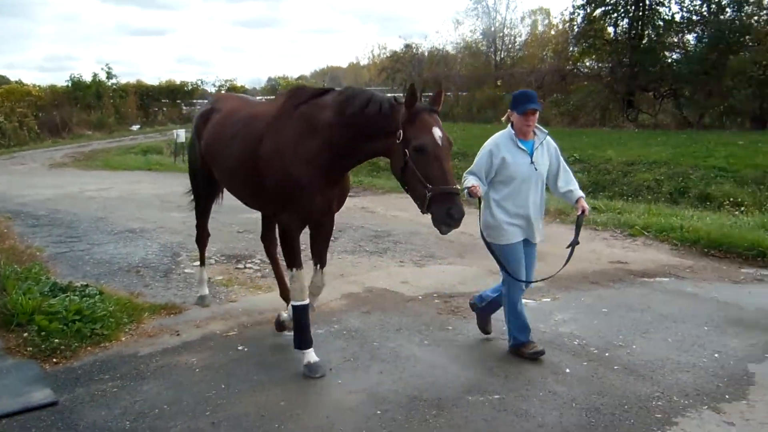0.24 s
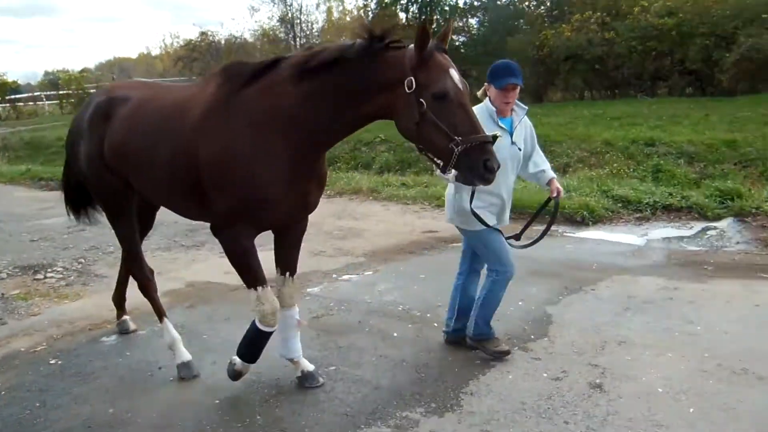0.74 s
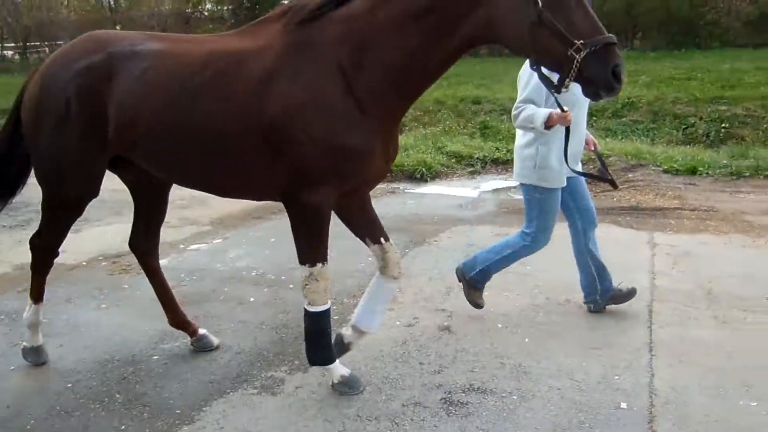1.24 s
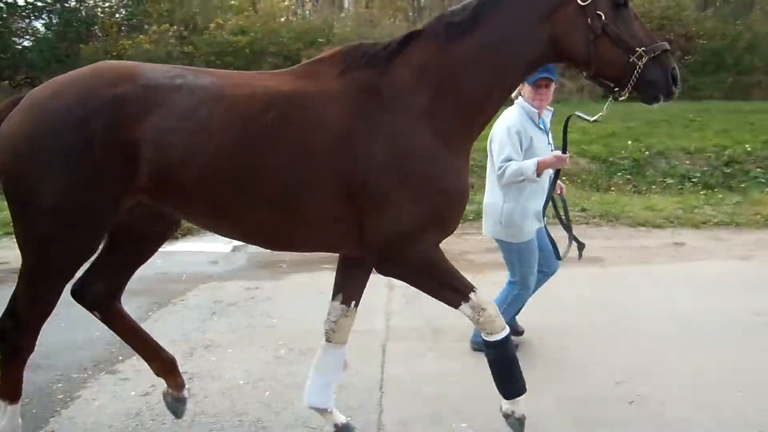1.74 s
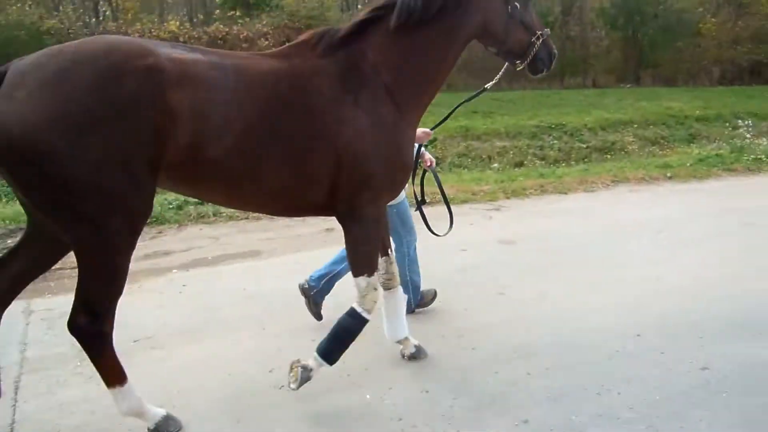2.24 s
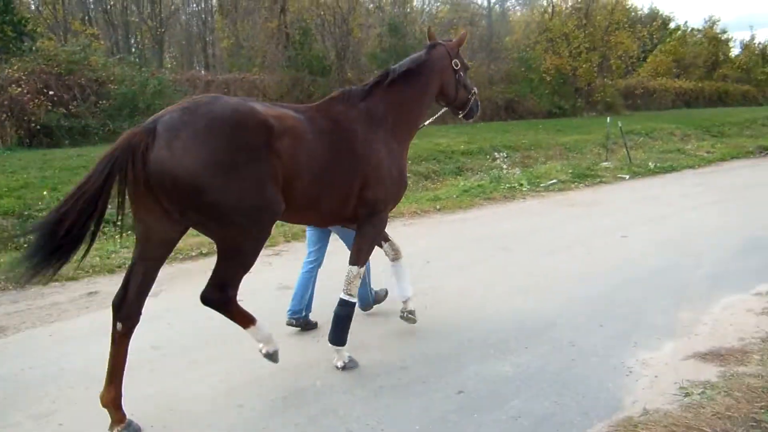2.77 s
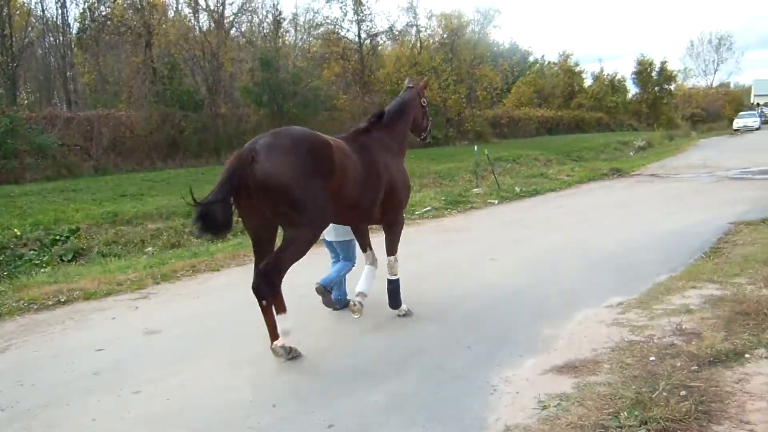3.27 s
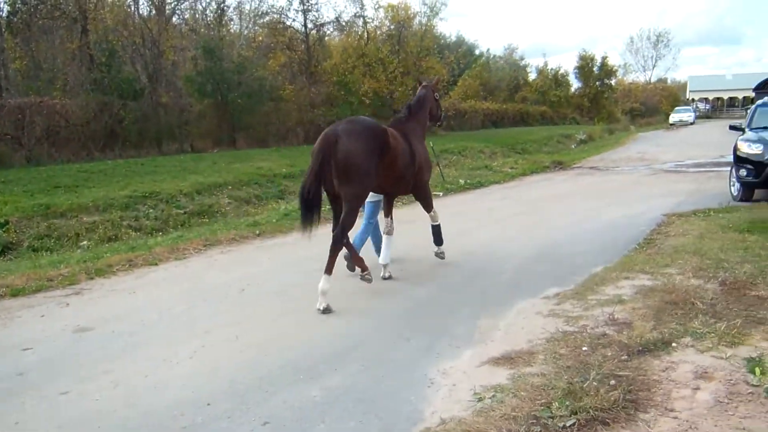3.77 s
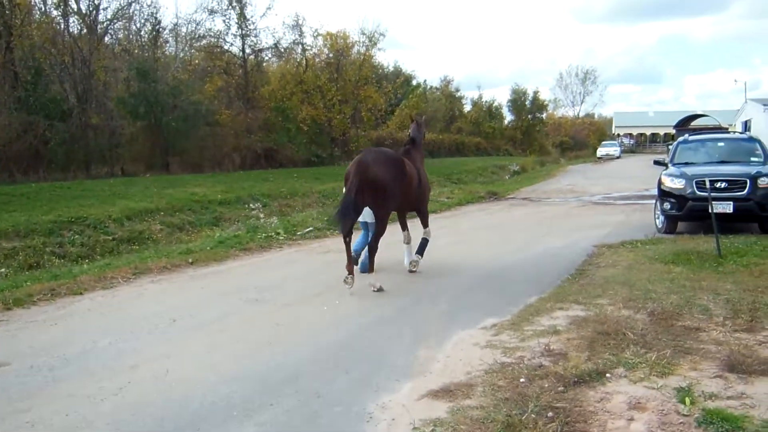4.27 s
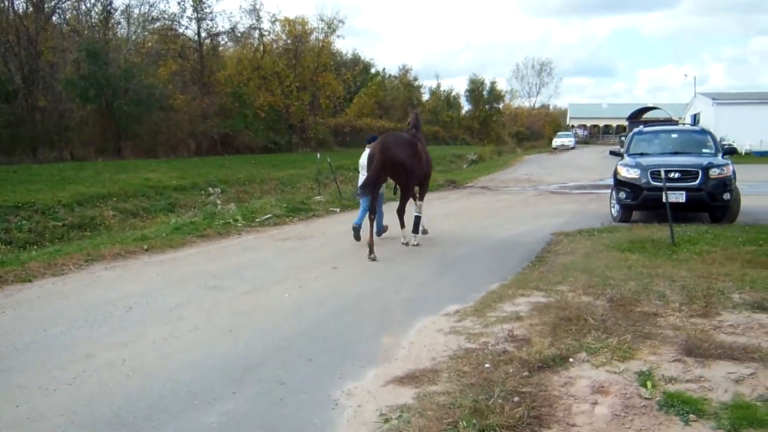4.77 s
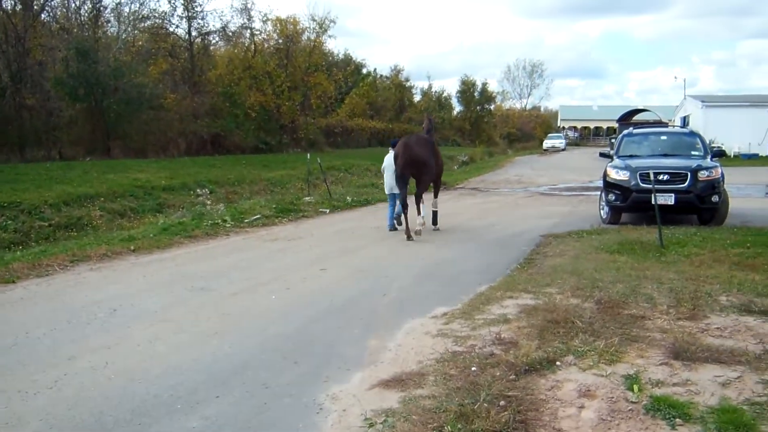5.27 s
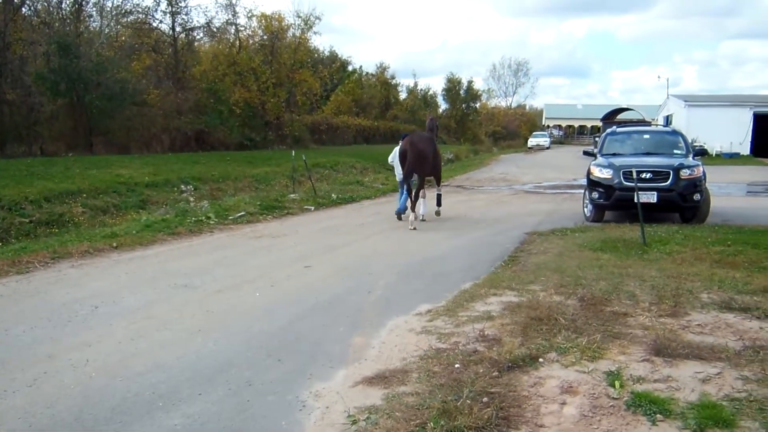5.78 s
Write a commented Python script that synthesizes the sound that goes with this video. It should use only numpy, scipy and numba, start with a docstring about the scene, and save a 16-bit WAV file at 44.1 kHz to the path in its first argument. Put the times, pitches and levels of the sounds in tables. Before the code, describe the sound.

A shod horse trots past on a paved drive, gritty clip-clops ringing close, a lead chain jingling, wind buffeting the microphone.

```python
"""A shod horse is led at a trot past two close microphone ports and away along a paved drive.
Footfalls are clusters of heel, toe and sliding contacts: struck resonators plus grit noise and stone pings.
A lead chain chinks (noise swells through high resonances); shoes brush sand (grainy band noise).
Far birds whistle (gliding sines); wind buffets the ports over a distant roar (noise in narrow bands)."""
import sys
import numpy as np
from scipy import signal
from scipy.io import wavfile
from scipy.ndimage import uniform_filter1d, map_coordinates
from numba import njit

SR = 44100
rng = np.random.default_rng(int(sys.argv[2]) if len(sys.argv) > 2 else 0)


def unload_audio(sound):
    """Save the sound as a 16-bit wav file, at the path given as the first command line argument."""
    columns = np.transpose(np.atleast_2d(sound))
    # keep every value between -1 and 1, then stretch to whole-number steps
    steps = np.round(np.clip(columns, -1, 1) * 32767)
    wavfile.write(sys.argv[1], SR, steps.astype(np.int16))


N = 265129
SIDES = np.array([[1], [-1]])  # sign of the unshared part at the left and right port


def undb(db):
    """Amplitude ratio of a level in dB."""
    return 10 ** (np.asarray(db) / 20)


def unit(x):
    """Scale to an RMS of 1."""
    return x / np.sqrt(np.mean(x ** 2))


@njit
def svf(x, hz, width):
    """State-variable band-pass, gain 1 at the centre, which may move every sample."""
    y, b, l = np.empty(len(x)), 0., 0.
    for i in range(len(x)):
        g, k = np.tan(np.pi * hz[i] / SR), width / hz[i]
        v = (b + g * (x[i] + 1e-18 - l)) / (1 + g * (g + k))
        b, l, y[i] = 2 * v - b, l + 2 * g * v, k * v
    return y


def narrow_noise(hz, width_hz):
    """White noise through one fixed resonance."""
    return svf(rng.standard_normal(N), np.full(N, hz), width_hz)


def band(x, lo_hz, hi_hz):
    """Butterworth band-pass, second order at each edge."""
    return signal.sosfilt(signal.butter(2, [lo_hz, hi_hz], "band", fs=SR, output="sos"), x)


def curve(table):
    """Breakpoints (t/s, value) interpolated to every sample."""
    s, value = np.transpose(table)
    return np.interp(np.arange(N) / SR, s, value)


def walk(rate_hz):
    """Random levels held 1 / rate_hz and slewed twice."""
    k = int(SR / rate_hz)
    held = np.repeat(rng.standard_normal(N // k + 1), k)
    return uniform_filter1d(uniform_filter1d(held, k), k)[:N]


def bursts(s, db, fade_ms, rise_ms=0.13):
    """Impulses through two one-pole smoothers: rise and exponential fade."""
    env = np.zeros(N)
    np.add.at(env, np.clip((s * SR).astype(int), 0, N - 1), undb(db))
    env = signal.lfilter([1], [1, -np.exp(-1e3 / (fade_ms * SR))], env)
    keep = np.exp(-1e3 / (rise_ms * SR))
    return signal.lfilter([1 - keep], [1, -keep], env)


def grains(spread_db):
    """Dense noise whose samples now and then stand far out, like breaking grit."""
    return unit(rng.standard_normal(N) * undb(spread_db * rng.exponential(size=N)))


def ring(x, modes, detune=0.95):
    """Struck-body resonances of alternating sign, equally loud for a short blow whatever their width."""
    out = 0
    for k, (hz, width_hz, db) in enumerate(modes):
        gain = (-1) ** k * undb(db) * SR / (2 * np.pi * width_hz)
        out = out + gain * svf(x, hz * detune * np.ones(len(x)), 1. * width_hz)
    return out


def ports(mid, side, pan_db=0.):
    """Two close ports: shared and unshared parts, right port delayed; positive pan favours the left."""
    # the right port hears the horse later while it is off to one side: t/s, lag/samples
    bearing = [(0, .5), (1.8, 1.1), (2.8, .5), (4, .3), (5, .1), (6, 0.)]
    late = map_coordinates(mid - side, [np.arange(N) - curve(bearing)], order=3, mode="nearest")
    return np.array([(mid + side) * undb(pan_db / 2), late * undb(-pan_db / 2)])


def roar():
    """Distant roar: third-octave-spaced noise bands flicker alone and part between ports in the treble."""
    # overall level: t/s, level/dB
    roar_level = [(0., -39), (.6, -43), (1.12, -39), (1.49, -44), (2.39, -46), (3.55, -45), (3.8, -52),
                  (4.05, -42.5), (4.65, -44), (5.04, -38.5), (5.5, -43), (6.01, -35.5)]
    # relative spectral density: f/Hz, level per Hz/dB
    colour = [(76, -30), (130, -27), (225, 4.5), (421, -15), (599, 5.5), (939, 6), (1940, -12.5),
              (4680, -19), (11700, -16), (14000, -20)]
    known_hz, known_db = np.transpose(colour)
    out = 0
    for hz in 140 * 2 ** np.arange(0, 4.6, 1 / 3):
        mid, side = (narrow_noise(hz, hz / 4) for _ in range(2))
        db = np.interp(np.log(hz), np.log(known_hz), known_db) + 6.6 * walk(12)
        apart = np.clip(0.062 + (hz / 3500.0) ** 1.4 + 14.0 / hz, 0, 1)
        out = out + undb(db) * (mid + apart * side * SIDES)
    return unit(out) * undb(curve(roar_level))


def wind():
    """Low turbulence on the ports: each eddy size puffs on its own and follows the gusts by its own slope."""
    # gusts: t/s, relative level/dB
    gusts = [(0.0, -39), (0.08, -35.5), (0.27, -36), (0.44, -45), (1.12, -43), (1.39, -52.5), (1.57, -41),
             (2.44, -53.5), (2.53, -41), (2.86, -39.5), (2.91, -32.5), (3.15, -42), (3.21, -31),
             (3.6, -47.5), (3.87, -34.5), (4.6, -43.5), (4.8, -56), (4.9, -40), (5.39, -47.5), (5.62, -37),
             (5.72, -43.5), (5.77, -32.5), (5.89, -38), (6.01, -37)]
    gust_db = curve(gusts)
    mean_db = np.mean(gust_db)
    out = 0
    # f/Hz, width/Hz, relative level/dB, dB per dB of gust
    for hz, width_hz, db, steep in ((32.2, 8.9, -2.0, 1.0), (57.7, 18.0, -5.0, 1.23),
                                    (82.8, 12.7, -6.5, 0.87), (143.0, 58.0, -15.5, 1.32)):
        strength = undb(db + mean_db + steep * (gust_db - mean_db))
        mid, side = (unit(narrow_noise(hz, width_hz)) * strength * undb(2.67 * walk(15))
                     for _ in range(2))
        out = out + mid + .7 * side * SIDES
    return out


def scuff():
    """Sandy drag hiss, grainy, nearly unrelated at the ports, swelling under the handler's soft shoes."""
    # shoes and hooves dragging over sand between footfalls: t/s, relative level/dB
    drag = [(0.0, -41), (0.62, -47.5), (1.19, -42), (1.54, -54.5), (2.58, -54), (2.78, -49), (3.67, -54),
            (4.27, -46.5), (4.67, -51), (6.01, -49.5)]
    # handler's soft shoes brushing sand, onset 20 ms before t: t/s, drive level before smoothing/dB
    steps = [(2.745, -63), (3.488, -37), (3.801, -36), (4.12, -33.5), (4.42, -40), (4.79, -38), (5.08, -34),
             (5.45, -47)]
    s, db = np.transpose(steps)
    brush = undb(curve(drag) + 0.5 * walk(19)) + bursts(s - .02, db, fade_ms=8.3, rise_ms=18.0)
    mid, side = (unit(band(grains(2.36), 2100, 13600)) * brush for _ in range(2))
    return mid + 0.86 * side * SIDES


def contacts():
    """Listed contacts and random loose grit in time order; fine grit and trail levels by rule and chance."""
    # hooves and kicked grit on paving:
    # t/s, relative thud level/dB, relative hoof ring level/dB, relative grit level/dB, largest stone f/kHz
    strikes = [(.03,-50,-49,-18,2.64), (.0875,-27,-32,-26,9.6), (.0993,-43,-31,-31,3.4),
               (.1081,-10.5,-7.5,-9,3.26), (.1175,-42,-24.5,-50,2.3), (.1441,-16,-7.5,-10,8.4),
               (.1672,-39,-34,-25.5,4.4), (.3113,-28,-26,-39,2.2), (.3326,-22,-13,-15,4.33),
               (.3452,-21.5,-22,-17,3.2), (.3521,-18,-15.5,-14,1.53), (.3763,-26,-30,-33,2.4),
               (.5989,-28.5,-17.5,-19,4.3), (.621,-18,-16,-8,8.2), (.6412,-34,-38,-55,3.4),
               (.7863,-35,-20,-29.5,2.4), (.794,-28,-20,-24,3.4), (.8033,-35,-31,-24,2.9),
               (.8116,-28.5,-22.5,-24,3.3), (1.0648,-21.5,-20.5,-18,4.), (1.0867,-31,-35,-33,4.3),
               (1.1876,-45,-41,-28.5,6.2), (1.2198,-28,-31,-27,2.3), (1.2268,-15,-12.5,-9,2),
               (1.2575,-17,-13,-7.5,6), (1.53,-29,-29,-26,7.8), (1.5399,-26,-12.5,-24,2.1),
               (1.5459,-27,-35,-16.5,3.3), (1.5545,-23,-13.5,-19,7.4), (1.5624,-9.5,-15.5,-14.5,7.1),
               (1.576,-40,-30,-49,1.9), (1.588,-30,-35,-30,7.3), (1.596,-41,-36,-20.5,1.9),
               (1.6017,-29,-30,-21,6), (1.6198,-35,-35,-29,5), (1.8887,-19,-14.5,-8,6.4),
               (1.899,-34,-20.5,-41,1.9), (1.9067,-29,-19,-35,2.1), (1.9162,-44,-38,-31,1.9),
               (1.9334,-30,-28,-21,3), (1.9369,-23,-16,-13,7.4), (2.042,-48,-37,-30.5,7.),
               (2.1548,-51,-27,-23.5,7.4), (2.2454,-27,-13,-21,1.6), (2.2559,-22,-18,-25,3.6),
               (2.2709,-33,-12.5,-19.5,2.), (2.2779,-23,-45,-38,2.1), (2.2879,-15.5,-10.5,-10,7.8),
               (2.308,-25,-28,-30,7.7), (2.5912,-33,-10,-11.5,1.7), (2.5968,-27,-15,-25,3.6),
               (2.6034,-22,-19,-21,1.9), (2.615,-24.5,-10.5,-14.5,7.3), (2.6347,-42,-26,-36,6.8),
               (2.6614,-40,-24.5,-28.5,4.6), (2.8521,-51,-50,-24,3.76), (2.8586,-44,-50,-21,8.5),
               (2.873,-55,-44,-30,9.3), (2.8803,-36,-40,-33,7.1), (2.917,-26,-11.5,-15,2.1),
               (2.9265,-28.5,-13,-13.5,7.5), (2.9371,-50,-8,-18,4.3), (2.9419,-29,-24,-22,3.9),
               (2.9478,-21,-16,-32,3.1), (2.9545,-17,-14,-11,3.27), (2.9729,-41,-24,-45,2.7),
               (3.152,-37,-40,-30.5,4.1), (3.2117,-34,-26,-23.5,3.1), (3.2593,-21,-6.5,-7.5,1.78),
               (3.2699,-30,-8.5,-11.5,1.9), (3.277,-33,-15,-10.5,7.5), (3.2865,-31,-29,-40,1.8),
               (3.296,-45,-36,-41,8.1), (3.5924,-31,-15,-21.5,1.5), (3.5989,-53,-13,-8.5,6.64),
               (3.606,-40,-15.5,-24,6.1), (3.6144,-33,-23.5,-19.5,2.05), (3.6294,-38,-38,-29,7.6),
               (3.857,-44,-32,-33.5,3), (3.864,-54,-41,-38,5.), (3.9036,-43,-12,-12,4.4),
               (3.921,-36,-11,-12,1.76), (3.9274,-36,-8.5,-13.5,3.4), (3.9353,-23,-15,-12,9),
               (3.9436,-26,-21,-23,2.7), (3.9556,-43,-24,-34,6.9), (4.2135,-33,-28,-36,2.9),
               (4.233,-41,-13,-14.5,1.5), (4.2427,-30,-12.5,-18.5,2.2), (4.2518,-18.5,-11.5,-11.5,2.84),
               (4.2578,-21,-14.5,-19,2.6), (4.2656,-29,-7.5,-20,6.3), (4.278,-36,-15.5,-30,3.1),
               (4.5787,-47,-11,-13,3.5), (4.5874,-34,-10.5,-8.5,1.95), (4.596,-23.5,-15,-12,4.2),
               (4.6057,-22,-12,-11,1.7), (4.613,-44,-14.5,-22,4.5), (4.6197,-21.5,-26,-38,2.1),
               (4.6303,-32,-38,-31,4.5), (4.897,-32,-20.5,-28.5,1.6), (4.9094,-30,-17,-26,1.7),
               (4.9223,-25.5,-13,-16,3.2), (4.928,-31,-21,-22,5.8), (4.9346,-22,-12,-21.5,3.7),
               (4.9558,-37,-34,-34,3.1), (5.2585,-26,-10,-9.5,2.73), (5.2747,-34,-11,-18,4.8),
               (5.2783,-21.5,-23,-23,1.9), (5.2884,-35,-22,-20,2), (5.292,-33,-28,-37,1.9),
               (5.3082,-37,-22.5,-25.5,2.3), (5.3208,-49,-34,-39,1.9), (5.3283,-35,-33,-32,2.2),
               (5.3512,-39,-33,-23,2.4), (5.6015,-43,-18.5,-19,3.4), (5.6101,-32,-24,-24,3.4),
               (5.6151,-25,-17.5,-37,5), (5.6226,-26,-18,-21.5,3.7), (5.6301,-46,-18.5,-19.5,2.5),
               (5.6422,-42,-30,-28,2.3), (5.9594,-25,-10.5,-15,3), (5.9709,-27,-22,-19.5,5.4),
               (5.9803,-28,-40,-17,2), (5.9905,-26,-28,-29,5.2), (5.9957,-24,-20,-22,3.1)]
    # faint loose grit skipping between footfalls
    loose_per_s, low_khz, high_khz = 12, 2.07, 7.8
    loose_db, loose_spread_db = [-46, -46, -44.5], 2.5  # thud, ring, grit
    loose_s, pitch = rng.random((int(loose_per_s * N / SR), 2)).T
    scatter_db = loose_spread_db * rng.standard_normal((len(loose_s), 3)) + loose_db
    loose_khz = low_khz * (high_khz / low_khz) ** pitch
    rows = np.vstack([strikes, np.column_stack([loose_s * N / SR, scatter_db, loose_khz])])
    s, thud_db, ring_db, grit_db, stone_khz = rows[np.argsort(rows[:, 0])].T

    fine_chance, trail_chance = rng.standard_normal((len(s), 2)).T
    octaves = np.log2(stone_khz / 4)
    # fine grit is stronger where stones are small, and thins out as the horse draws away
    passes_s, fade_db_per_s = 1.95, -1.5
    gone_s = np.maximum(s - passes_s, 0)
    fine_db = grit_db - 4.5 + 3 * octaves + fade_db_per_s * gone_s + 2.5 * fine_chance
    # trail relative to its crack: weaker after a hard crack and for small stones
    trail_db = -8 - 0.19 * (grit_db - np.mean(grit_db)) - 1.5 * octaves + 2.5 * trail_chance
    return s, thud_db, ring_db, grit_db, stone_khz * 1e3, fine_db, trail_db


def stones(s, db, hz, fade_ms):
    """One short damped ping per contact, from the stone that takes the blow."""
    t = np.arange(400) / SR
    phase = rng.random((len(s), 1))
    env = np.exp(-t * 1e3 / fade_ms) * (1 - np.exp(-t / 0.000081))
    ping = env * np.sin(2 * np.pi * (hz[:, None] * t + phase))
    out = np.zeros(N + len(t))
    np.add.at(out, (s * SR).astype(int)[:, None] + np.arange(len(t)), undb(db)[:, None] * ping)
    return out[:N]


def hooves():
    """Every contact pushes the leg, rings the hoof capsule and cracks the grit under the shoe."""
    # leg and ground modes: f before the 0.95 detune/Hz, width/Hz, relative level/dB
    leg_modes = [(258, 116, -2.5), (566, 156, 2.5)]
    # hoof capsule modes: f before the per-contact shift/Hz, width/Hz, relative level/dB
    hoof_modes = [(1027, 257, 1.5), (1079, 73, -2), (1252, 164, 3.5), (1704, 132, -5.5), (2340, 990, 5.5),
                  (3420, 1100, -23)]
    s, thud_db, ring_db, grit_db, stone_hz, fine_db, trail_db = contacts()

    # a rough edge on the push shares each contact's energy a little differently among the modes
    push = bursts(s, thud_db, fade_ms=0.83) * (1 + 2.8 * grains(0.79))
    thud = undb(-26.0) * ring(push, leg_modes)

    # each hoof and landing angle leaves a different hollow under the sole, which shifts the ring
    shift = 1 + .07 * rng.standard_normal(len(s) + 1)
    hollow = shift[np.searchsorted(s, np.arange(N) / SR)]
    blow = bursts(s, ring_db, fade_ms=0.19, rise_ms=0.04)
    blow_trail = 0.68 * bursts(s, ring_db + trail_db, fade_ms=7.9) * grains(0.38)
    clop = undb(-16.5) * ring(blow + blow_trail, hoof_modes, hollow)

    # a sharp crack, then a trail of settling grains
    snap_ms = .45
    slip = undb(6 * walk(350))  # the shoe sticks and slips, which breaks the trail into patches
    grit = 0.89 * bursts(s, grit_db, snap_ms, snap_ms / 2)
    grit += slip * bursts(s, grit_db + trail_db, fade_ms=6.83, rise_ms=1.54)
    fine = 2.04 * bursts(s, fine_db, snap_ms, snap_ms / 2)
    fine += slip * bursts(s, fine_db + trail_db, fade_ms=8.8, rise_ms=0.75)
    coarse_mid, coarse_side = (band(grit * grains(2.63), 1800, 8000) for _ in range(2))
    sand_mid, sand_side = (band(fine * grains(2.63), 8000, 14500) for _ in range(2))
    ping = undb(2.0) * stones(s, grit_db, stone_hz, fade_ms=1.46)

    # grit breaks all along the shoe, so its treble differs at the ports; the left catches more of the top
    wide = .65
    body = thud + clop + ping + undb(4) * coarse_mid
    low = ports(body, wide * undb(4.5) * band(coarse_side, 3900, 13000), pan_db=-.8)
    return low + ports(undb(6.5) * sand_mid, wide * undb(-3.0) * sand_side, pan_db=1.9)


def puffs():
    """Brief lumps of air on the ports: 45-248 Hz noise under short envelopes."""
    # short puffs within the gusts, onset 12 ms before t: t/s, drive level before smoothing/dB
    lumps = [(0.198, -35), (0.291, -32), (3.356, -31), (3.39, -35.5), (3.891, -25), (5.774, -31.5),
             (5.82, -35)]
    s, db = np.transpose(lumps)
    env = bursts(s - .012, db, fade_ms=8.2, rise_ms=9.2)
    mid, side = (unit(band(rng.standard_normal(N), 45, 248)) * env for _ in range(2))
    return 2.16 * (mid + 0.54 * side * SIDES)


def birds():
    """Thin whistles from far off: gliding sines, two samples later and slightly louder at the right."""
    # notes: t/s, length/s, start f/Hz, end f/Hz, peak level at the left port/dB
    notes = [(0.23, 0.088, 5000, 4970, -46), (5.02, .02, 7300, 7250, -44), (5.046, .02, 8100, 8000, -43),
             (5.395, .02, 7100, 7050, -46), (5.482, .02, 7050, 7000, -45), (5.572, .015, 7050, 7000, -44),
             (5.73, .04, 6200, 6150, -48), (4.02, .05, 5300, 5300, -47), (5.146, .05, 8200, 6950, -45),
             (5.437, 0.017, 8100, 7950, -40), (5.53, .045, 5280, 5280, -50), (5.53, .02, 8100, 8000, -43),
             (5.713, 0.044, 8200, 7500, -40.5), (5.82, 0.046, 8000, 7560, -41),
             (5.902, .03, 8100, 7600, -39), (5.825, .03, 7060, 6960, -44), (5.912, .03, 7100, 7000, -42)]
    out = np.zeros(N)
    for s, length_s, from_hz, to_hz, db in notes:
        n, at = int(length_s * SR), int(s * SR)
        cycles = np.cumsum(np.linspace(from_hz, to_hz, n)) / SR
        out[at:at + n] += undb(db) * np.hanning(n) ** .5 * np.sin(2 * np.pi * cycles)
    return np.array([out, 1.1 * np.roll(out, 2)])


def chain():
    """Small links rattle together: a very high short ring, a hiss of contact and a duller knock."""
    # link knocks: t of swell peak/s, relative chink level/dB, f before the 0.95 detune/Hz, rise to peak/ms
    links = [(.915, -20, 10160, 2.6), (0.9321, -14.5, 11700, 3.3), (.9373, -17, 11800, 4.9),
             (0.9583, -21, 11600, 3.4), (1.0172, -25, 9400, 3.9), (1.0314, -10.5, 12000, 4.7),
             (1.0639, -18, 11300, 2.3), (1.0786, -19, 10700, 4), (1.0948, -19, 12600, 4),
             (1.1, -22, 13000, 4), (1.1091, -12.5, 11500, 1.9), (1.1486, -30, 12700, 4.7),
             (1.266, -14, 12600, 16), (1.277, -7.5, 12630, 9.6), (1.2861, -22, 14100, 13),
             (1.2948, -23, 12600, 9.6), (1.328, -31, 12400, 15), (1.374, -13, 12300, 4.8),
             (1.3897, -32, 13800, 5.3), (1.404, -25, 12400, 3.9), (1.702, -36.5, 12200, 6),
             (3.052, -32.5, 9750, 3.5)]
    # link modes: multiple of the link f, width at a 10 ms rise/Hz, relative level/dB
    link_modes = [(.74, 400, -18), (1., 150, 0), (1.035, 200, -3), (1.1, 170, -4)]
    knock_db, knock_db_per_doubling = -11, -8.5  # knock re chink at a 4 ms rise; brief touches knock harder
    mid, t = np.zeros(N), np.arange(SR // 10) / SR
    for s, chink_db, hz, ms in links:
        rise_s = ms * 1e-3
        swell = t / rise_s * np.exp(1 - t / rise_s)
        rattle = swell * rng.standard_normal(len(t)) * undb(2.56 * rng.exponential(size=len(t)))
        # links that touch only briefly are damped by their neighbours and ring wider
        modes = [(min(k * hz, 16000), w * 10 / ms, db) for k, w, db in link_modes]
        chink = undb(-23) * (10 / ms) ** .5 * ring(rattle, modes)
        hiss = undb(-11.0) * band(rattle, 7600, 17700)
        knock = np.exp(-t / 0.0034) * band(rng.standard_normal(len(t)), 2860, 12000)
        start, peak = int((s - rise_s) * SR), int(s * SR)
        mid[start:start + len(t)] += undb(chink_db) * (chink + hiss)
        knock_gain = undb(chink_db + knock_db + knock_db_per_doubling * np.log2(ms / 4))
        mid[peak:peak + len(t)] += knock_gain * knock
    return ports(mid, 0.049 * np.roll(mid, 3), pan_db=1.5)


def scene():
    """Sum of all sources at the two ports."""
    return roar() + wind() + scuff() + hooves() + puffs() + birds() + chain()


def record(dry):
    """Clip at full scale, cut the top with a steep elliptic low-pass, clip again."""
    top_hz = 14100
    low_pass = signal.ellip(9, .3, 75, top_hz, fs=SR, output="sos")
    return np.clip(signal.sosfilt(low_pass, np.clip(dry, -1, 1)), -1, 1)


dry = scene()
out = record(dry)
unload_audio(out)
```